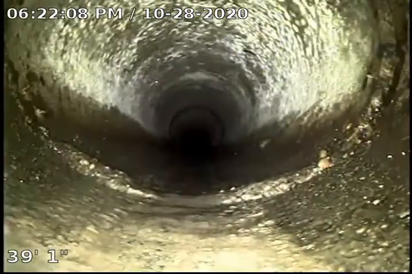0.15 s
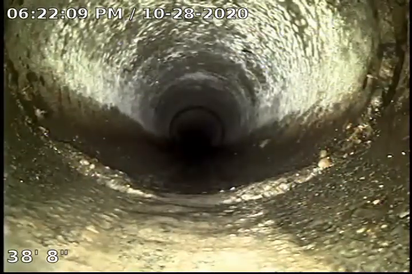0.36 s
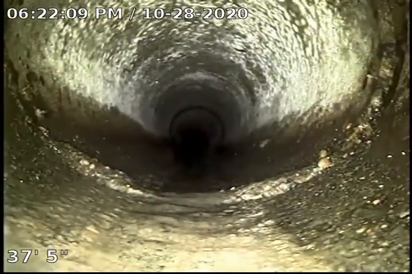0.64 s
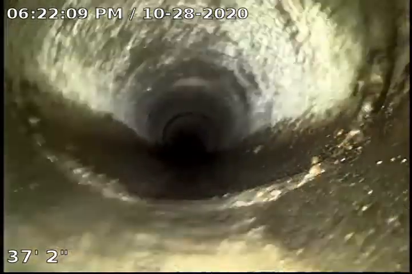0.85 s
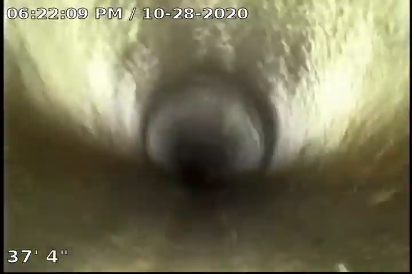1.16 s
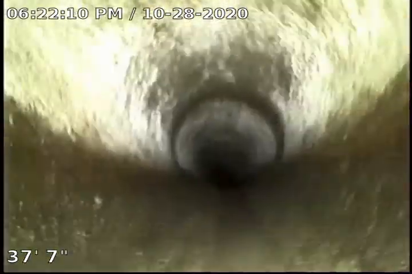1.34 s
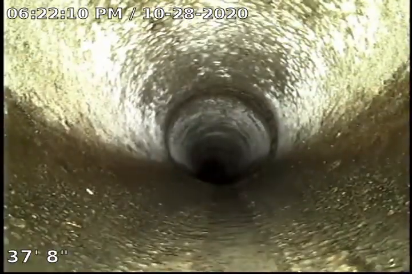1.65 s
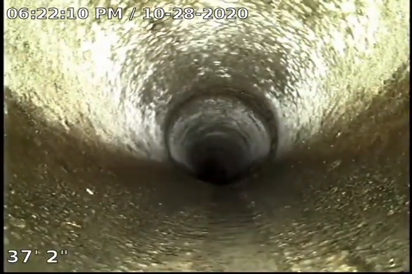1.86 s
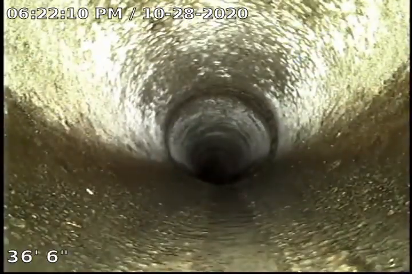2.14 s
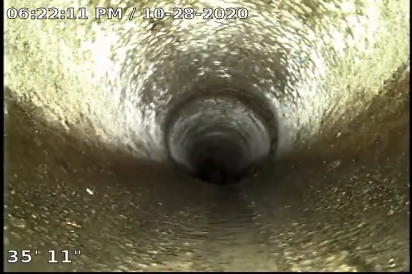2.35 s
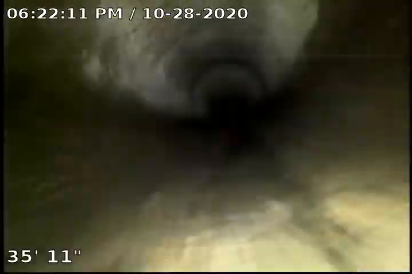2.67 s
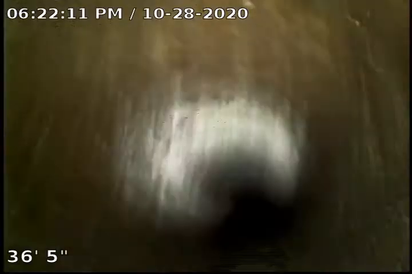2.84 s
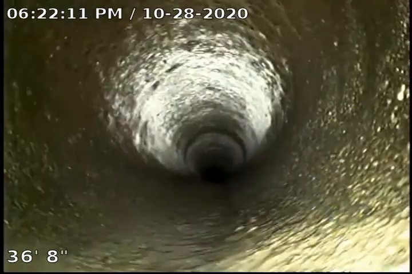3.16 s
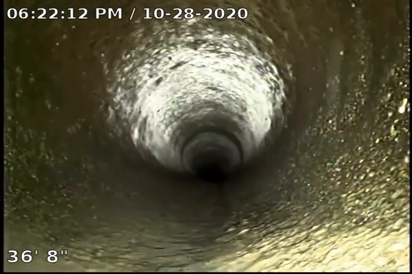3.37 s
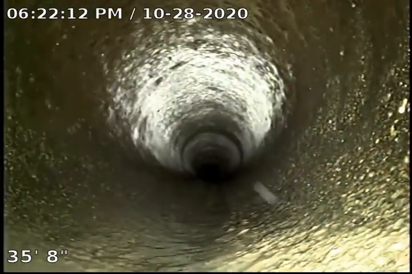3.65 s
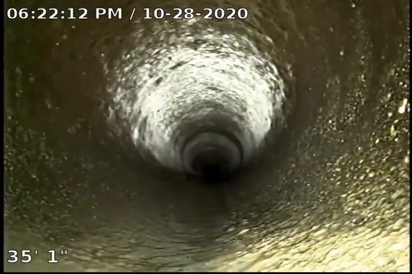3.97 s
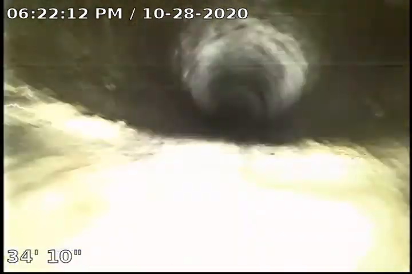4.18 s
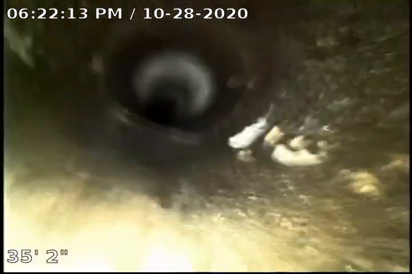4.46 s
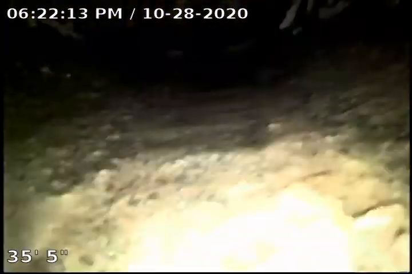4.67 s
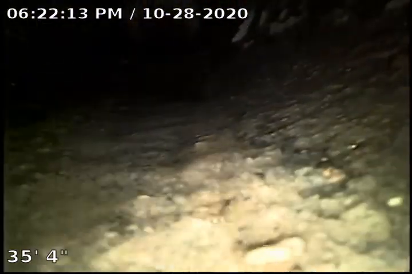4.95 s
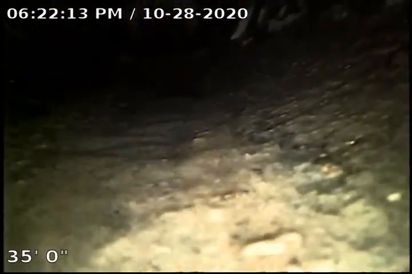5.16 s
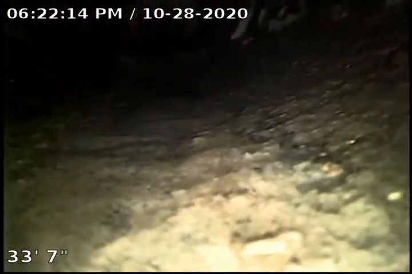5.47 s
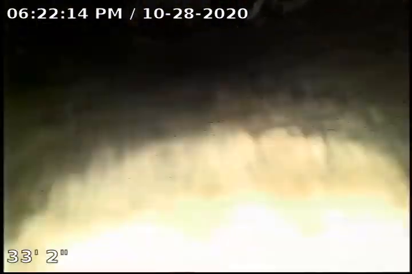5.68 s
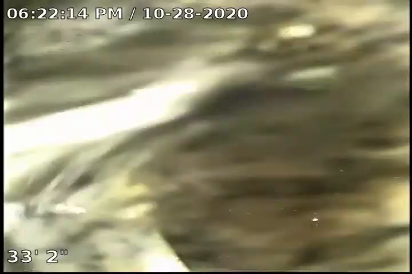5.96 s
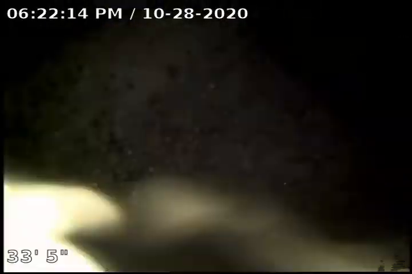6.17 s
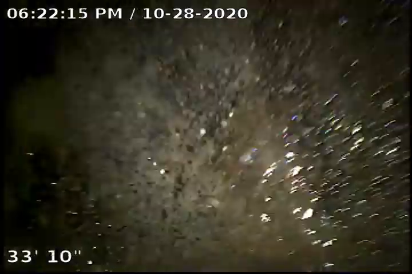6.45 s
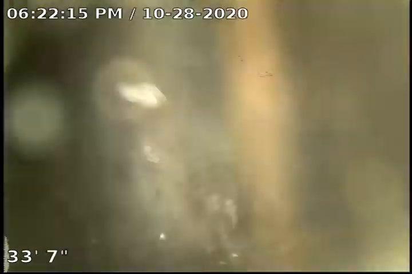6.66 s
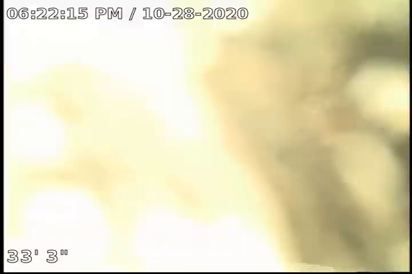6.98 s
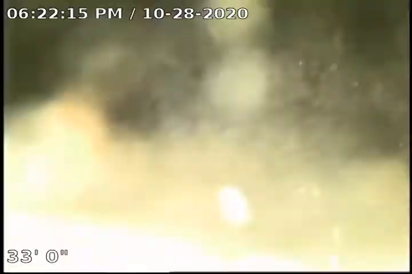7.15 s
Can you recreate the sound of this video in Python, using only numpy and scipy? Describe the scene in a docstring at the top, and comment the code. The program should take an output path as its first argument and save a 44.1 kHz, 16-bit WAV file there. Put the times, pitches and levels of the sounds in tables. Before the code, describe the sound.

A stiff cable is dragged back by hand onto a hollow reel beside a drain, heard very close, the same in both channels. A scrape is already under way at 0 s, fading as glove hiss and a tight cluster of knocks arrive from 0.3 to 0.75 s, one at 0.67 hard enough to distort. Light pulls and small taps follow. A stronger scrape and low judder swell from 1.4 to 2.3 s, with a violent crack at 1.98. Shorter pulls and clacks continue around 2.5-2.8, then a longer rub to 3.9 with hiss near its end. After a quieter moment at 4.5, the heaviest judder peaks about 5.05, and hard blows land at 5.36. Smaller knocks run to 6.15; softer rubbing and hiss peak near 6.6, ease off, and a faint last pull is starting to swell as it stops at about 7.3. A low rush and wavering hum persist throughout, with barely any wall reflection.

```python
"""Push cable hauled back onto its reel

Beside a drain, a stiff cable comes back by hand, pull after pull: noise and sparse catches scrape over
the pipe rim and judder the hollow reel; the gloved hand adds a hiss. Knocks are noise bursts ringing in
frame and shell, with a swelling drum note; nearby walls return a faint tail. A low drone of shaped noise
and unsteady hum lies under it all. The microphone sits on the reel and overloads on the hardest knocks.
"""
import sys
import numpy as np
from scipy import signal
from scipy.fft import rfft, irfft, next_fast_len
from scipy.io import wavfile
from scipy.ndimage import uniform_filter1d, map_coordinates

SR = 44100
rng = np.random.default_rng(int(sys.argv[2]) if len(sys.argv) > 2 else 0)


def put_to_file(sound):
    """Save the sound as 16-bit audio at rate SR, in the file named by the first command-line argument."""
    columns = np.atleast_2d(sound).T  # one column per channel
    safe = np.clip(columns, -1, 1)
    whole_steps = np.round(safe * 32767)
    wavfile.write(sys.argv[1], SR, whole_steps.astype(np.int16))


N = 322812


def amp(db):
    """Gain of a level in dB."""
    return 10 ** (np.asarray(db) / 20)


def unit(x):
    """x at rms 1."""
    return x / np.sqrt(np.mean(x ** 2) + 1e-20)


def peak(x):
    """x at peak 1."""
    return x / np.abs(x).max()


def along(points, hz):
    """(f, value) points read on a log frequency axis."""
    f, value = np.transpose(points)
    return np.interp(np.log(hz + 1), np.log(f + 1), value)


def curves(rows):
    """One value per sample for each column after the time."""
    s, *columns = np.transpose(rows)
    t = np.arange(N) / SR
    return [np.interp(t, s, column) for column in columns]


def wobble(rate):
    """A smooth random curve, rate knots a second."""
    knots = rng.standard_normal(int(N * rate / SR) + 4)
    return map_coordinates(knots, [np.arange(N) * rate / SR])


def filtered(x, response):
    """x passed through a complex response of frequency."""
    m = next_fast_len(x.shape[-1] + 8192)
    spectrum = rfft(x, m) * response(np.fft.rfftfreq(m, 1 / SR))
    return irfft(spectrum, m)[..., :x.shape[-1]]


def modes(table):
    """The causal response of a set of resonances, with alternating signs."""
    def response(f):
        total = 0
        for k, (centre, width, db) in enumerate(table):
            damping = 1j * f * width
            total = total + (-1) ** k * amp(db) * damping / (centre ** 2 - f ** 2 + damping)
        return total
    return response


def coloured(x, spectrum):
    """x given a spectrum, at rms 1."""
    return unit(filtered(x, lambda hz: amp(along(spectrum, hz))))


def grit(rate, spread_db, smooth):
    """Sparse catches of uneven size, rate a second, on a bed of smooth friction."""
    size = amp(spread_db * np.minimum(rng.exponential(size=N), 3))
    catches = (rng.random(N) < rate / SR) * size * rng.standard_normal(N)
    return unit(catches) + smooth * rng.standard_normal(N)


def patchy(x, depth_db):
    """Short patches of random gain: the contact point keeps shifting, and its colour with it."""
    z = signal.stft(x, nperseg=256)[2]
    field = rng.standard_normal(z.shape)
    for axis in (0, 1):  # blur across frequency, then time
        field = uniform_filter1d(field, size=4, axis=axis)
    return signal.istft(z * amp(depth_db * unit(field)), nperseg=256)[1][:N]


# Background noise at the reel, spectrum shape: f/Hz, level/dB per Hz
RUSH = [(12, -25), (20, 7), (34, -14), (49, -0.5), (197, -3.5), (326, -10), (509, -6.5), (619, -12),
        (1940, -18.5), (2300, -22), (3120, -23.5), (10400, -41.5), (15800, -57)]
# The low hum in it: t/s, f/Hz, level/dB
HUM = [(0, 98, -58), (2.5, 98, -47), (4.2, 98, -48.5), (5.3, 98, -56), (5.5, 82, -49), (6.4, 83, -47.5),
       (7.32, 84, -47)]
RUSH_DB = -39.5


def drone():
    """A background rush of noise, nearly steady, with a low hum whose pitch and level waver."""
    hz, db = curves(HUM)
    phase = 2 * np.pi * np.cumsum(hz + 1.7 * wobble(18)) / SR
    hum = amp(db) * unit(wobble(24) + 1.5) * np.sqrt(2) * np.sin(phase)
    rush = coloured(rng.standard_normal(N), RUSH)
    return amp(RUSH_DB + 0.54 * wobble(3.0)) * rush + hum


# Pulls of the hand: start t/s, scrape turning point t/s, limit t/s, scrape level/dB,
# judder turning point t/s, judder level/dB. The last pull reaches its limit while still swelling.
PULLS = [(-.3, 0.124, 0.75, -24, .28, -23.5), (.66, .75, 0.93, -34, 0.8, -25.5),
         (0.844, 1.06, 1.356, -32, 0.96, -39), (1.36, 1.79, 2.34, -22.5, 1.75, -22),
         (2.372, 2.65, 2.93, -27, 2.68, -25.5), (2.964, 3.416, 3.92, -25, 3.57, -28),
         (3.924, 4.303, 4.48, -34, 4.15, -46), (4.61, 5.08, 5.61, -22, 5.04, -16.5),
         (5.677, 5.907, 6.23, -32, 6.2, -28), (6.267, 6.6, 6.918, -27.5, 6.45, -34.5),
         (7.108, 7.403, 7.3, -38, 7.3, -32.5)]
SCRAPE_POWER, JUDDER_POWER = 1.71, 1.57  # gain follows the course of a pull to this power
REST_SCRAPE_DB, REST_JUDDER_DB = -46.5, -43  # the cable never lies quite still


def pulls():
    """Most pulls swell and fade in an arch; the last is still swelling just before the sound stops."""
    t = np.arange(N) / SR

    def arch(start, turn, limit):
        return np.sin(np.pi / 2 * np.interp(t, [start, turn, limit], [0, 1, 0]))

    scrape, judder = amp(REST_SCRAPE_DB), amp(REST_JUDDER_DB)
    for start, scrape_turn, limit, scrape_db, judder_turn, judder_db in PULLS:
        scrape = scrape + amp(scrape_db) * arch(start, scrape_turn, limit) ** SCRAPE_POWER
        judder = judder + amp(judder_db) * arch(start, judder_turn, limit) ** JUDDER_POWER
    return scrape, judder


# Cable rubbing on the pipe rim, spectrum shape: f/Hz, level/dB per Hz
SCRAPE = [(150, 2), (260, -2), (399, -5), (494, -5.5), (712, -7.5), (1040, -8.5), (1250, -10), (1370, -10),
          (2270, -14.5), (3180, -18), (3820, -20.5), (4590, -22), (10000, -41), (13000, -99), (22000, -120)]
# A resonance that the rubbing excites: f/Hz, width f/Hz, level/dB of the ring added to the scrape
RIM = (3096, 380, 1.2)


def rim_scrape(tug):
    """Friction noise and dense small catches at the rim, swayed by the uneven grip, excite a resonance."""
    rub = patchy(grit(1400, spread_db=2.5, smooth=1.84), depth_db=2.0)
    sway = amp(1.14 * tug + 0.39 * wobble(90))
    scrape = coloured(sway * rub, [(70, -20.5)] + SCRAPE)
    return unit(scrape + filtered(scrape, modes([RIM])))


# Low modes of the hollow reel, also sounded by the knocks: f/Hz, width f/Hz, level/dB
DRUM = [(150.4, 24, -5.5), (175, 21.4, 5), (214.5, 61, 2.5)]
LUMP_DB = 3  # depth of the lumps in the judder


def reel_judder(tug):
    """Lumpy friction with sparser catches shakes the reel, heard through its low modes twice over."""
    drum = modes(DRUM)
    shaking = amp(LUMP_DB * tug) * grit(90, spread_db=0.5, smooth=1.8)
    return unit(filtered(shaking, lambda f: drum(f) ** 2))


# Washes of treble hiss: most as the glove slides along the cable, the one at 0.423 s a brief wash
# around a knock: start t/s, length t/s, level/dB above 10.5 kHz
WASHES = [(-.05, 0.26, -50.5), (0.245, .12, -46), (0.423, 0.15, -41.5), (0.527, .16, -38),
          (0.665, 0.11, -45), (1.548, 0.16, -47), (1.698, 0.34, -51), (1.94, 0.56, -43.5),
          (3.29, 0.16, -48), (3.65, 0.16, -49), (3.782, 0.26, -43), (4.866, 0.54, -55), (5.25, 0.4, -46.5),
          (6.597, 0.54, -46.5), (7.094, 0.31, -50)]
WASH_ATTACK, WASH_RELEASE = 0.25, 0.4  # shares of the length


def hiss_washes():
    """Each wash of hiss rises, holds and lets go."""
    t = np.arange(N) / SR
    shape = np.array([0, WASH_ATTACK, 1 - WASH_RELEASE, 1])
    total = np.zeros(N)
    for s, length, db in WASHES:
        total += amp(db) * np.interp(t, s + length * shape, [0, 1, 1, 0]) ** 2
    return total


# Hiss, mostly of glove on cable, spectrum shape: f/Hz, level/dB per Hz
HISS = [(880, -50), (1500, -16), (1580, 1), (2040, -16), (2600, -3), (3900, -7.5), (4430, -0.5),
        (10500, -9.5), (15800, -5.5)]


def treble_hiss():
    """Patchy noise, mostly heard as glove on cable, scaled to rms 1 above 10.5 kHz."""
    friction = amp(1.4 * wobble(30)) * rng.standard_normal(N)
    hiss = coloured(patchy(friction, depth_db=3.0), HISS)
    return hiss / np.std(filtered(hiss, lambda hz: hz > 10500))


GRIP_DB, REST_HISS_DB = -32.5, -58.5  # hiss of the gripping glove re scrape gain; hiss at rest


def cable():
    """The sliding cable scrapes, shakes the reel in lumps and hisses in the treble."""
    rubbing, shaking = pulls()
    tug = wobble(22)  # uneven grip of the rim, felt by scrape and reel alike
    hissing = hiss_washes() + amp(GRIP_DB) * rubbing + amp(REST_HISS_DB)
    return rubbing * rim_scrape(tug) + shaking * reel_judder(tug) + hissing * treble_hiss()


# Knocks on the reel: t/s, crack level/dB, drum level/dB re crack, shell level/dB re crack
# (each before the fixed gain of its part), crack centre f/Hz, crack 60 dB decay t/s, drum note f/Hz, drum swell t/s
KNOCKS = [(0.332, -24, 9.5, -0.5, 910, 0.026, 209, 0.018), (.464, -13, -10, -26, 2870, 0.046, 153, 0.039),
          (.473, -4, -1.5, -12.5, 1570, 0.028, 208, 0.016), (0.495, -23, 3, -5, 1030, .024, 199, .028),
          (0.551, -23.5, -8, -3.5, 1350, 0.032, 207, 0.024), (.63, -22, -3, -11, 867, 0.11, 218, 0.022),
          (.655, -8, -10, -18, 1060, 0.032, 196, .036), (.672, 10.5, -10.5, -12, 1830, 0.043, 235, 0.028),
          (.686, -3.5, 9, 1, 1150, 0.017, 176, 0.023), (.722, -10, 8.5, -2.5, 965, 0.039, 215, 0.017),
          (0.94, -18.5, -8, -6, 1020, 0.043, 229, 0.026),
          (.963, -12.5, -8.5, -12.5, 1720, 0.022, 220, 0.028),
          (1.056, -22.5, -5, -12, 1000, 0.033, 200, 0.024), (1.077, -14, -1, -9, 830, 0.032, 223, 0.018),
          (1.125, -26, 0.5, -8, 1130, 0.17, 187, 0.038), (1.199, -19.5, -5.5, -10, 1640, 0.051, 221, 0.019),
          (1.428, -21.5, -4, -26, 760, 0.026, 177, .028), (1.966, -6.5, -2, -18, 730, 0.054, 206, 0.017),
          (1.98, 12, -16.5, -6.5, 1580, 0.036, 186, 0.026), (2.03, -17, 2.5, 0, 1300, .05, 190, 0.041),
          (2.354, -29, 0.5, -19, 920, 0.059, 200, 0.016), (2.518, -13.5, -19, -21, 1126, 0.028, 231, .025),
          (2.55, -12.5, -11, -33, 1944, 0.063, 196, 0.016), (2.556, -9, -8, -16.5, 860, 0.047, 211, 0.047),
          (2.629, -18, -2, -9, 890, 0.039, 170, 0.02), (2.72, -10, -2, -4.5, 1350, 0.03, 234, 0.012),
          (2.732, -10.5, 3, -5, 900, .034, 221, 0.02), (2.827, -33, -3, -3.5, 762, 0.041, 198, .018),
          (3.137, -26.5, -24, -4.5, 1140, 0.048, 234, .02), (3.417, -11, -2, -15, 1000, 0.053, 205, 0.059),
          (3.554, -17.5, -26, -21, 940, 0.028, 170, 0.023), (3.676, -27.5, 5, -1, 1250, 0.02, 231, 0.0069),
          (3.791, -27.5, -10, -13, 1000, 0.048, 234, 0.022), (3.809, -24, -6, -4, 1390, 0.052, 229, 0.03),
          (3.835, -20.5, -18, 0.5, 1120, 0.02, 223, 0.015),
          (4.256, -27.5, 5.5, -0.5, 998, 0.08, 218, 0.018), (4.306, -20.5, -6, -9, 990, .066, 221, .02),
          (4.643, -18, -8.5, -27, 900, 0.021, 218, 0.029), (4.706, -34, 9, -20, 797, .04, 218, 0.017),
          (4.862, -23, 1, -3, 800, 0.023, 198, 0.023), (4.893, -8.5, 1.5, -17, 1050, 0.015, 215, 0.015),
          (5.12, -12.5, -12, -15, 950, 0.015, 218, .035), (5.212, -10.5, -11, -21, 1560, .055, 193, 0.028),
          (5.259, -12, -16, -6, 1050, 0.025, 229, .025), (5.347, -11, 2, -14, 945, .024, 221, 0.034),
          (5.361, 0, -7.5, -7.5, 770, 0.088, 234, .048), (5.371, 7, -7.5, -6, 1670, 0.03, 172, 0.025),
          (5.412, -20.5, 6, -1, 1500, 0.037, 200, .025), (5.747, -19.5, -14, -19, 1030, 0.022, 186, 0.027),
          (5.801, -25.5, 1, -19, 880, 0.07, 200, 0.02), (5.875, -7.5, -11, -6, 1100, 0.031, 223, 0.021),
          (5.904, -16, -8, -9, 900, .028, 207, .01), (5.95, -23, -25, -15, 1770, .053, 215, .025),
          (5.967, -25, -19, -3.5, 1250, .12, 159, 0.021), (5.998, -21.5, -10, -23, 1020, .026, 182, 0.068),
          (6.05, -11, -4, -10, 820, 0.055, 229, 0.042), (6.156, -31, 3, -0.5, 872, .05, 180, .018),
          (6.375, -32, -10, -6, 1390, 0.23, 210, .05), (6.868, -28.5, -3, -23, 740, 0.018, 164, 0.028),
          (7.187, -26.5, -22, -20, 820, 0.044, 205, .047), (7.307, -20.5, -22, -24, 1050, 0.049, 205, .025)]
# Plastic shell of the reel: f/Hz, width f/Hz, level/dB
SHELL = [(349, 145, -8), (477.8, 43.7, 4), (589, 65.5, -5)]
# Cable and frame: f/Hz, width f/Hz before broadening, level/dB before the focus of each blow
FRAME = [(694, 106, 3.5), (930, 123, 3), (1044, 71, 5.5), (1237, 77, 2.5), (1306, 105, 3.5),
         (1567, 174, 1.5), (1761, 100, 3.5), (2005, 89, 1), (2506, 122, -1), (2950, 205, -3.5),
         (3214, 205, 0.5), (3670, 730, -5.5), (4880, 220, -4.5), (5800, 1400, -15), (6470, 4000, -25)]
LEAD = 0.001208  # contact begins this long before the crack is heard (s)
FOCUS_DB, SOFTER = 7, .1  # fall of the crack per octave from its centre; a blow 1 dB softer falls this much more
RISE_S = .001  # rise of a crack (s)
SNAP_S, SNAP = .0016, 7.7  # delay of the first hard contact (s), and its size over the rattle


def struck_frame(db, centre_hz):
    """The spot that is struck favours the frame modes near its own pitch."""
    slope_db = FOCUS_DB - SOFTER * db
    return [(hz, 1.65 * width, level - slope_db * abs(np.log2(hz / centre_hz)))
            for hz, width, level in FRAME]


def drum_note(t, note_hz, swell_s):
    """The reel modes nearest the note ring under a swell that builds up, then the cable damps it."""
    u = t / swell_s
    ring = np.zeros(len(t))
    for hz, _, level in DRUM:
        tuned_hz = hz * (1 + rng.normal(0, 0.037))
        gain = amp(level - 30.0 * abs(np.log2(hz / note_hz)))
        ring += gain * np.sin(2 * np.pi * (tuned_hz * t + rng.random()))
    return peak(u * np.exp(-u ** 2) * ring)


def knocks():
    """Each blow is a short rattle in the frame; shell and drum answer, the drum swelling a little later."""
    out, t = np.zeros(N + SR), np.arange(SR // 3) / SR
    for s, db, drum_db, shell_db, centre_hz, crack_t60, note_hz, swell_s in KNOCKS:
        envelope = amp(-60 * (t / crack_t60) ** 1.79) * (1 - np.exp(-t / RISE_S))
        rattle, push = rng.standard_normal((2, len(t))) * envelope
        rattle[round(SNAP_S * SR)] += SNAP  # the snap of first hard contact
        crack = peak(filtered(rattle, modes(struck_frame(db, centre_hz))))
        push[:len(t) // 400] += 2.5  # the first push, which the heavier shell feels most
        shell = peak(filtered(push, modes(SHELL)))
        drum = drum_note(t, note_hz, swell_s)
        blow = amp(2.0) * crack + amp(shell_db + 9.0) * shell + amp(drum_db + 2.5) * drum
        out[round((s - LEAD) * SR):][:len(t)] += amp(db) * blow
    return out[:N]


def walls(x):
    """Nearby walls return a short dull tail, 400 samples late and 60 dB down after a further 0.17 s."""
    t = np.arange(SR // 3) / SR

    def dull(hz):
        return 1j * hz / (1j * hz + 400) / (1 + 1j * hz / 2500)

    tail = filtered(rng.standard_normal(len(t)) * amp(-60 * t / 0.17), dull)
    return signal.fftconvolve(np.pad(x, (400, 0)), tail / np.linalg.norm(tail))[:N]


def scene():
    """One microphone on the reel feeds both channels; only the knocks reach the walls."""
    blows = knocks()
    mid = cable() + blows + amp(-20.0) * walls(blows) + drone()
    return np.array([mid, mid])


OFFSET, CEILING = .0152, .985  # constant shift of the input and its clipping level (full scale = 1)
TOP_HZ = 15920  # upper band limit


def record(dry):
    """The microphone drops deep bass; the input rides on a small offset, clips hard and is band-limited."""
    thinned = filtered(dry, lambda hz: (1j * hz / (1j * hz + 60)) ** 2)
    clipped = np.clip(thinned + OFFSET, -CEILING, CEILING)
    return filtered(clipped, lambda hz: hz < TOP_HZ)


dry = scene()
out = record(dry)
put_to_file(out)
```